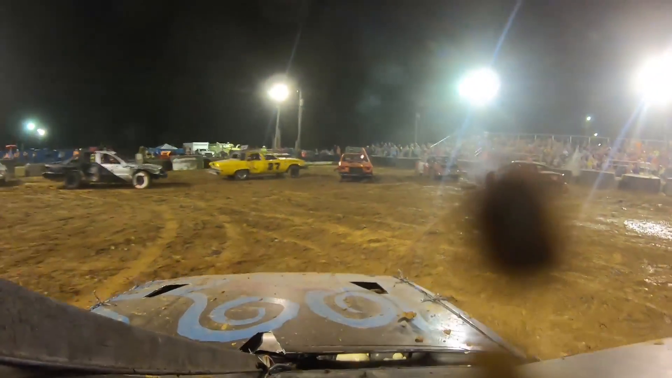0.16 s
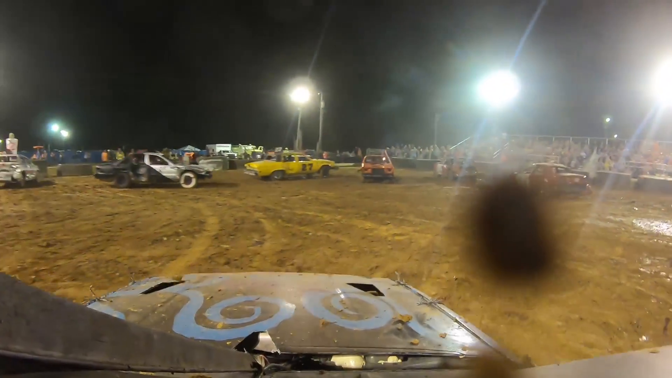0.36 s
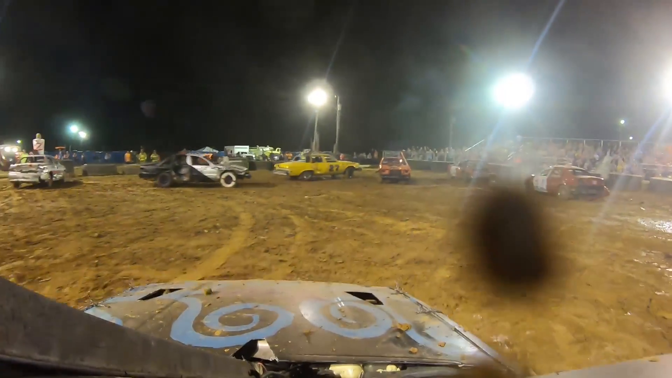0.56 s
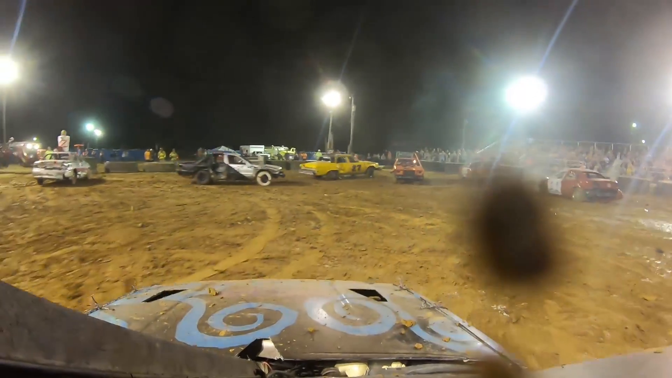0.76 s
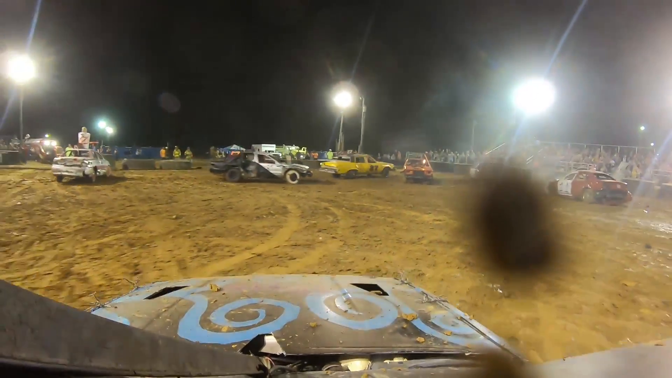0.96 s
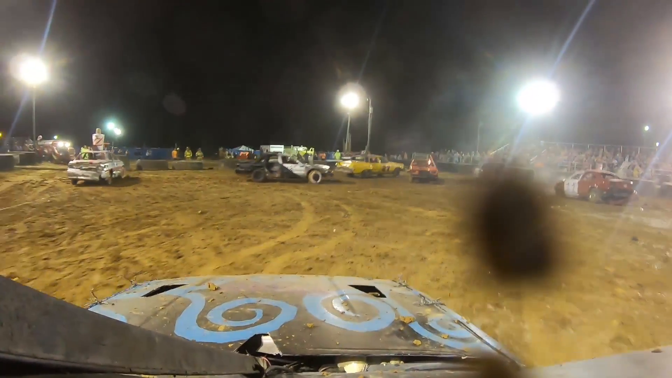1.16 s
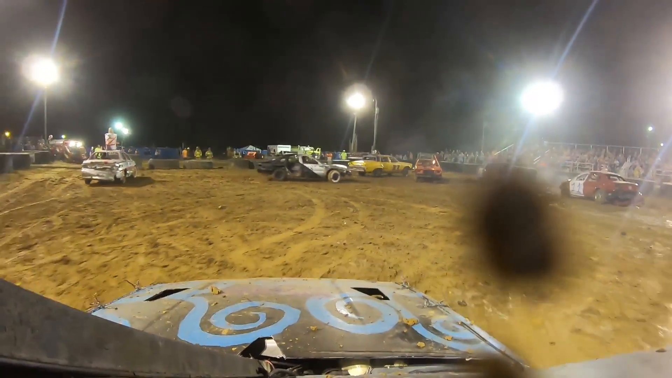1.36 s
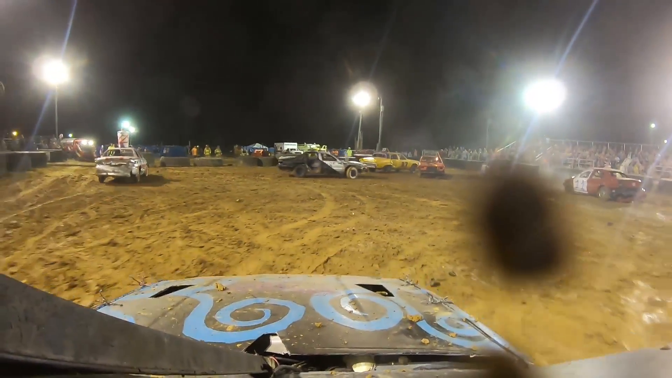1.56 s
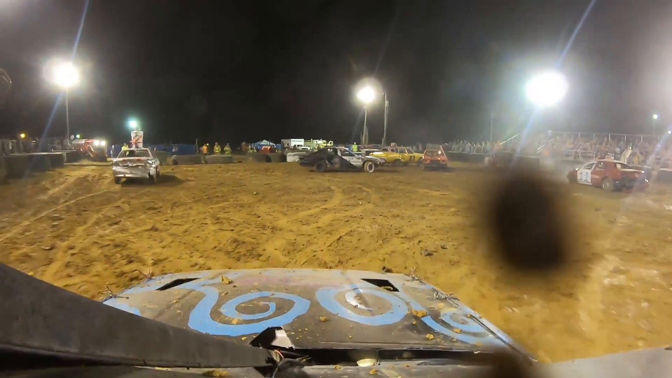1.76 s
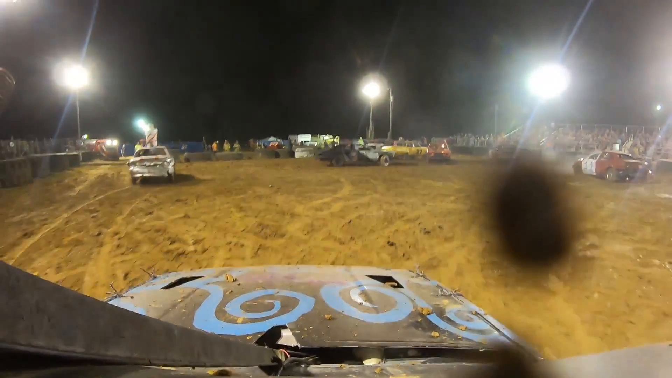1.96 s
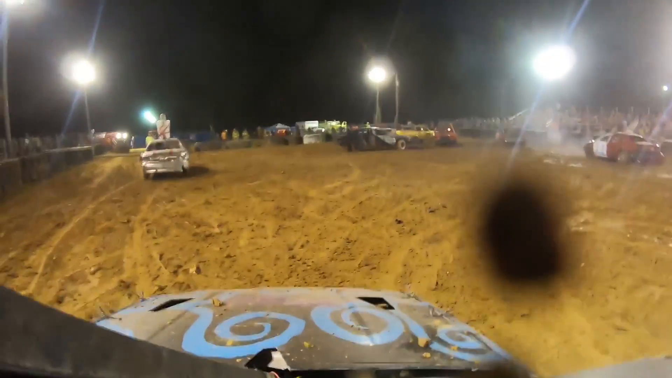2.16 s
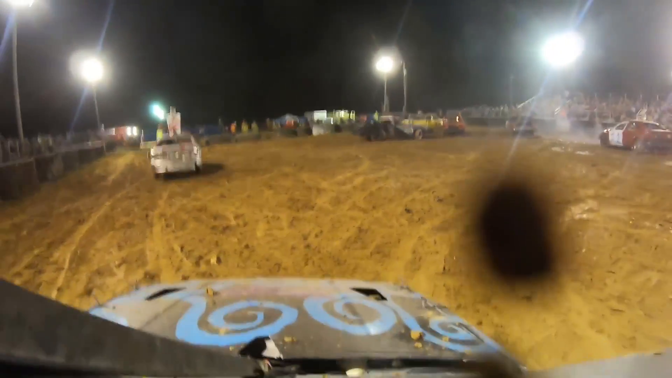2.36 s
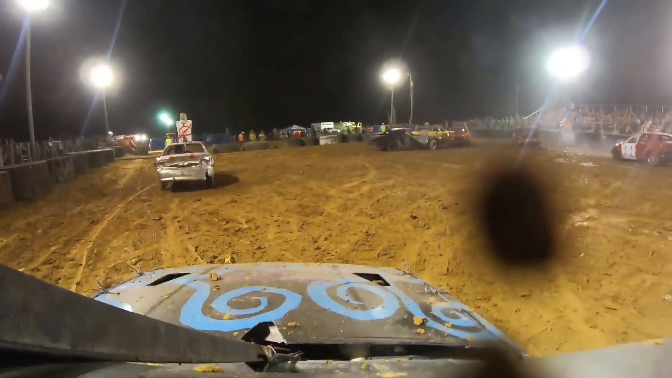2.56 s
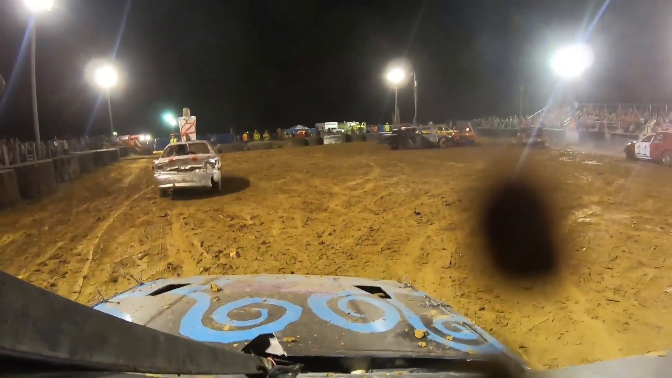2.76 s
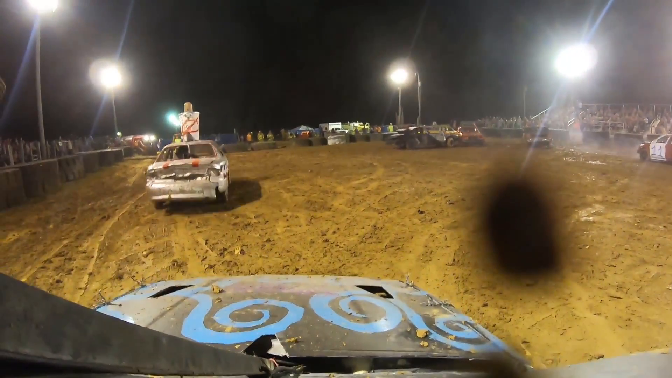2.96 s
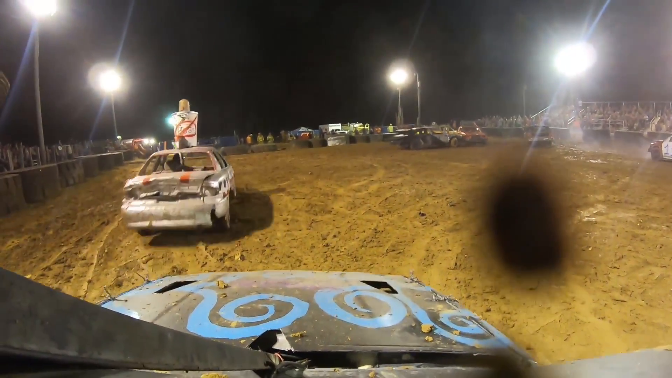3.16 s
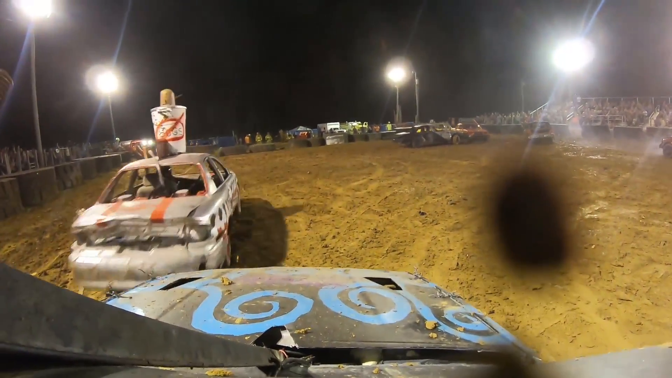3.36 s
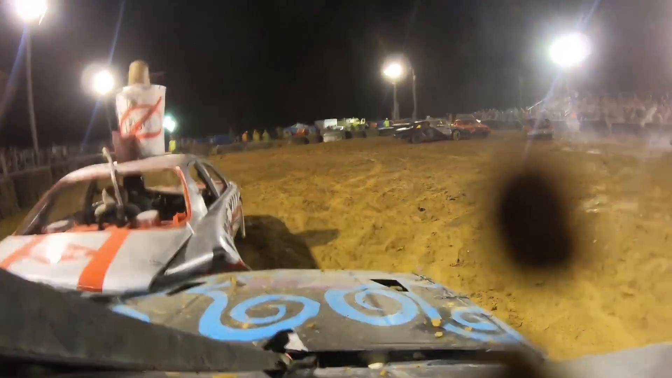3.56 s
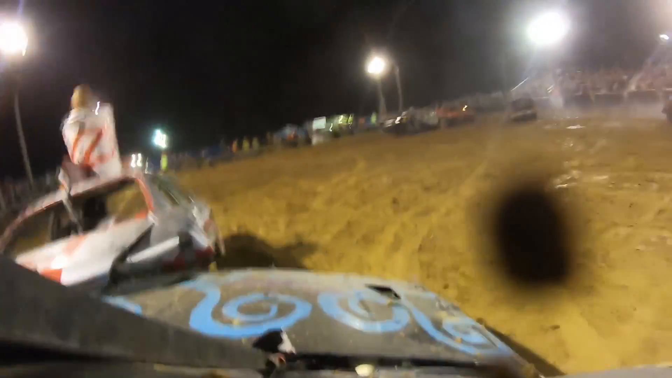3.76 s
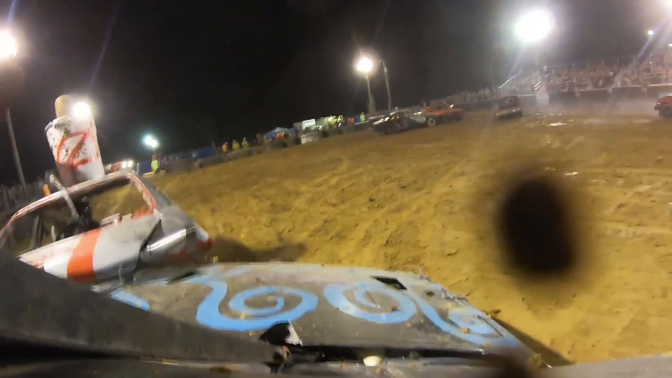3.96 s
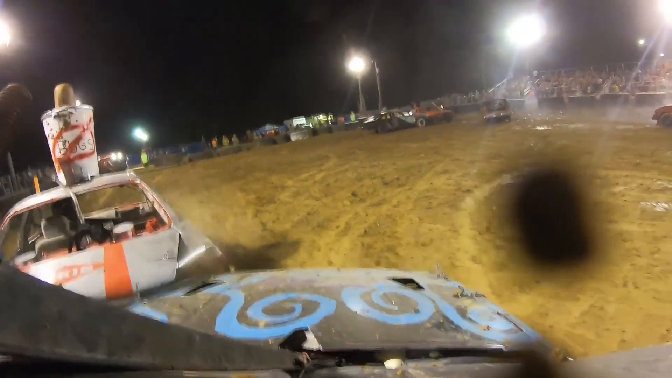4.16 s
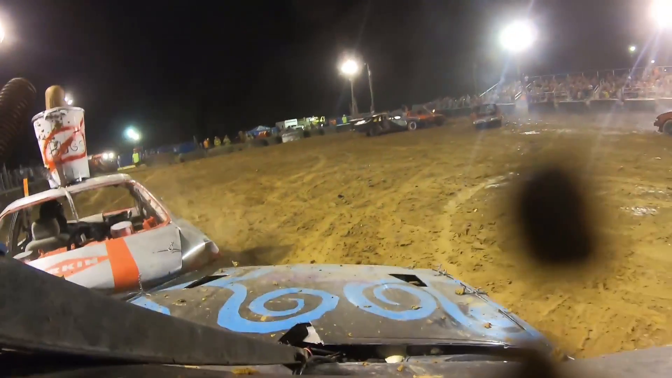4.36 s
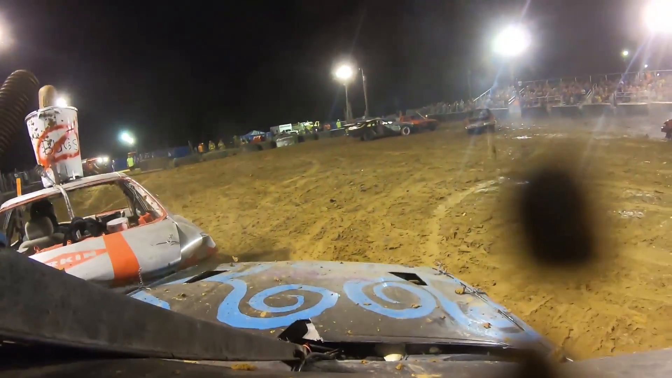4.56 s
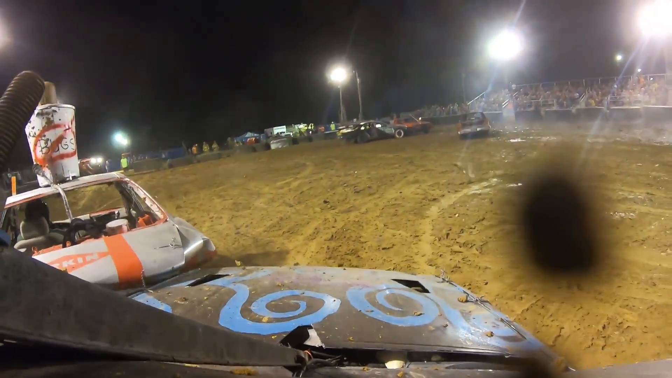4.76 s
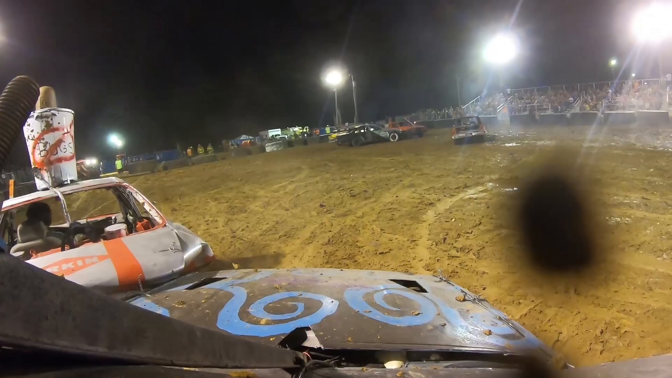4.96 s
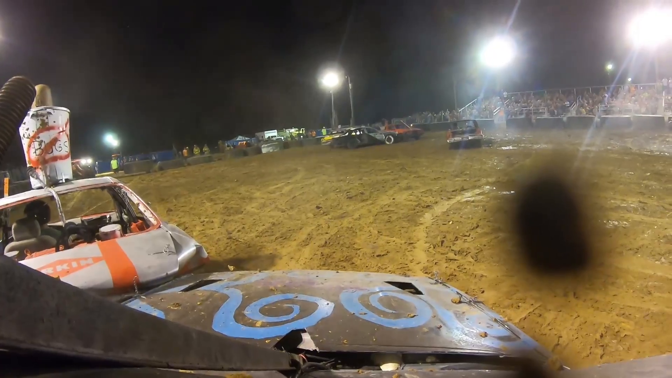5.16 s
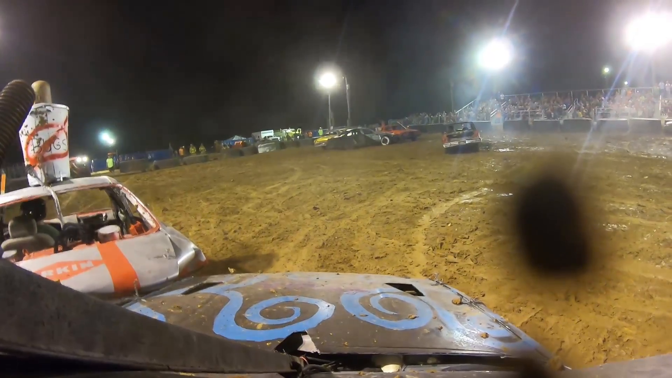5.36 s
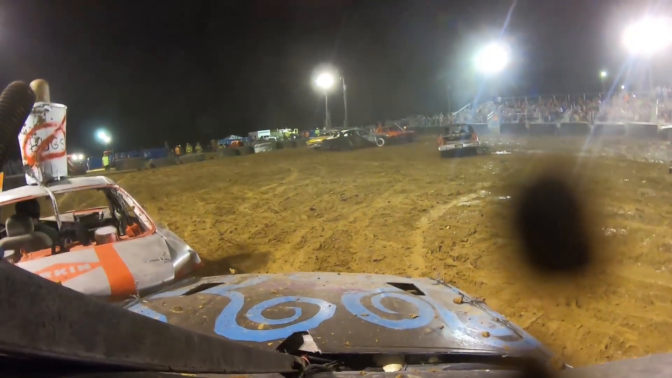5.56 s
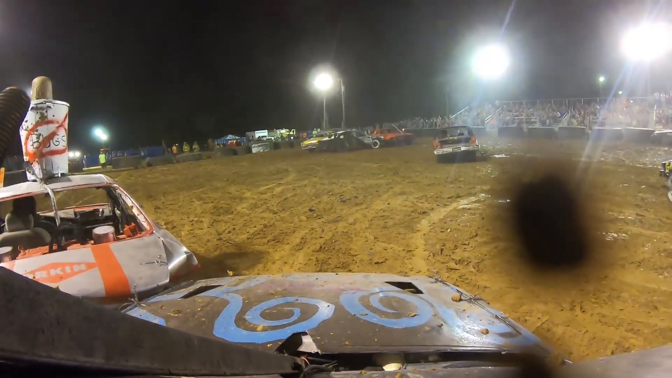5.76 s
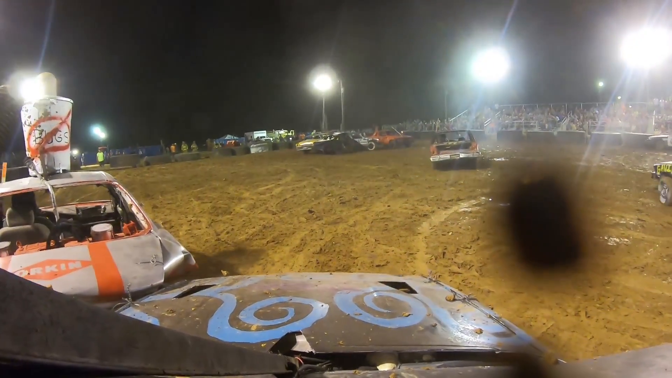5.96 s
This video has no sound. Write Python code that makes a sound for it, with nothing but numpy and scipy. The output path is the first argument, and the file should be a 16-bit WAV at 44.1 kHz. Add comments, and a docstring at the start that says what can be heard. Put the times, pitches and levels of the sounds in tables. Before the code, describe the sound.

A loud V8 heard inside a stripped car idles unevenly, revs twice with volleys of backfire, and metal crunches in a collision.

```python
"""An open-piped V8 lopes, is revved twice and spits volleys of pops, heard inside a stripped stock car.
Its uneven firings boom through the bare cabin and puff out a roar of gas; unburnt fuel bangs in the pipe.
Around it runs a demolition derby: engines drone across the arena, loose panels clank, and a rival car
crumples against the front corner. A limiter ducks the whole mix on the loudest peaks."""
import sys
import numpy as np
from scipy import signal
from scipy.fft import rfft, irfft
from scipy.io import wavfile
from scipy.ndimage import uniform_filter1d, minimum_filter1d

SR = 44100
rng = np.random.default_rng(int(sys.argv[2]) if len(sys.argv) > 2 else 0)


def store_pcm(level_fs):
    """Save levels as 16-bit WAV."""
    pcm = np.round(np.clip(level_fs, -1, 1) * 32767).astype(np.int16)
    wavfile.write(sys.argv[1], SR, np.atleast_2d(pcm).T)


N = 265041
T = np.arange(N) / SR


def amp(db):
    """Decibels to gain."""
    return 10 ** (np.asarray(db) / 20)


def unit(x):
    """Scales to rms 1."""
    return x / np.sqrt(np.mean(x ** 2) + 1e-20)


def curves(rows):
    """Automation lanes: each column of a timed table, at every sample."""
    times, *columns = np.transpose(rows)
    return [np.interp(T, times, column) for column in columns]


def gate(start_s, end_s, fade_s=0.081):
    """1 from start to end, with a fade outside each edge."""
    return np.clip(np.minimum(T - start_s, end_s - T) / fade_s + 1, 0, 1)


def add(mix, start_s, sound):
    """Drops a sound into the mix."""
    part = mix[max(round(start_s * SR), 0):][:len(sound)]
    part += sound[:len(part)]


def colour(x, points):
    """EQ curve that dies away within an octave past its ends; rms 1."""
    hz, db = np.transpose(points)
    hz = np.r_[hz[0] / 2, hz, hz[-1] * 2]
    db = np.pad(db, 1, constant_values=-100)
    bins_hz = np.fft.rfftfreq(len(x), 1 / SR)
    gain = amp(np.interp(np.log(bins_hz + 1), np.log(hz), db))
    return unit(irfft(rfft(x) * gain, len(x)))


def wander(rate_hz, hop=16):
    """Random motion up to about rate_hz; rms 1."""
    count = N // hop + 2
    bins_hz = np.fft.rfftfreq(count, hop / SR)
    slow = irfft(rfft(rng.standard_normal(count)) / (1 + (bins_hz / rate_hz) ** 4))
    return unit(np.interp(np.arange(N) / hop, np.arange(len(slow)), slow))


def ring(x, modes):
    """Passes x through a bank of resonances with steep skirts."""
    out = np.zeros(len(x))
    for hz, width, db in modes:
        band = signal.butter(2, [hz - width / 2, hz + width / 2], "band", fs=SR, output="sos")
        out += amp(db) * signal.sosfilt(band, x)
    return out


def steady(x, window_s):
    """Holds the short-term level at 1."""
    power = abs(uniform_filter1d(x ** 2, int(window_s * SR) + 1))
    return x / np.sqrt(power + 1e-12)


# Engines across the arena, one table each: time_s, firing_hz, level_db
FAR_ENGINES = [
    [(0, 87.2, -25.5), (.2, 92, -19), (.8, 110, -28), (1.05, 137.7, -23)],
    [(1.35, 185.9, -38), (1.55, 195.1, -24.5), (1.7, 210.9, -25), (2.9, 233.1, -27)],
    [(3.2, 94, -24.5), (3.4, 98.2, -17), (3.6, 113.3, -20)],
    [(4.9, 96.76, -21), (5.2, 108.4, -16), (5.33, 110.5, -21)],
]
def far_engines(waver=0.0079, fading_db=2.5, octave_db=-15, trim_db=-1, harmonics=5):
    """Distant drones: dull stacks of firing harmonics that glide and fade in and out."""
    out = np.zeros(N)
    for rows in FAR_ENGINES:
        hz, db = curves(rows)
        phase = 2 * np.pi * np.cumsum(hz * (1 + waver * wander(20.5))) / SR
        stack = sum(amp(octave_db * np.log2(k) + fading_db * wander(10)) * np.sin(k * phase)
                    for k in range(1, harmonics + 1))
        out += amp(db + trim_db) * gate(rows[0][0], rows[-1][0]) * unit(stack)
    return out


def arena_buzz(echo_s=0.007, waver=0.01402):
    """Sharp firings of the far engines, smeared by the arena into fine, shifting partials."""
    drift = 1 + waver * wander(14.02)
    pulses, t = np.zeros(N), np.arange(4096) / SR
    for rows in FAR_ENGINES:
        fired = np.floor(np.cumsum(curves(rows)[0] * drift) / SR)
        pulses += gate(rows[0][0], rows[-1][0]) * np.diff(fired, prepend=0)
    echo = rng.standard_normal(len(t)) * np.exp(-t / echo_s)
    return unit(signal.oaconvolve(pulses, echo)[:N])


# Hums, whirrs and hisses that swell and fade: start_s, end_s, pitch_hz, width_hz, level_db
BODY_HUMS = [(0.24, 0.57, 239, 6.6, -24), (0.78, 2.65, 242, 4.5, -27.5), (1.47, 1.74, 91, 7, -16),
             (2.11, 2.535, 229, 10.4, -21.5), (5.1, 5.35, 205, 73, -23.5), (5.66, 6.05, 234, 6.1, -26.5),
             (0.47, 1.42, 2087, 260, -28.5), (0.7, 2.4, 3330, 260, -39.5), (3.27, 3.67, 2780, 340, -42.5),
             (3.595, 3.675, 2800, 1000, -26.5), (2.52, 3.22, 4340, 540, -44.5), (5.6, 7.35, 4790, 380, -42),
             (1.04, 1.33, 7400, 1900, -50)]
def body_hums():
    """Narrow resonances of the body and engine bay, each shaken for a while; the low row near 90 Hz is a far
    engine's drone."""
    out = np.zeros(N)
    for start, end, hz, width, db in BODY_HUMS:
        arch = np.sin(np.pi * np.clip((T - start) / (end - start), 0, 1))
        tone = ring(rng.standard_normal(N), [(hz, width, 0)])
        out += amp(db) * arch * steady(tone, window_s=0.16)
    return out


# Sub-bass shakes of the shell: start_s, end_s, level_db
SHELL_SHUDDERS = [(0.296, 0.584, -18.5), (1.72, 1.92, -17.5), (2.96, 3.305, -18.5), (3.7, 4.378, -20.5)]
def shell_shudders(pitch_hz=39.1, waver=0.03):
    """The body shell shudders at its lowest resonance."""
    level = sum(amp(db) * gate(start, end) for start, end, db in SHELL_SHUDDERS)
    phase = 2 * np.pi * np.cumsum(pitch_hz * (1 + waver * wander(6.6))) / SR
    return level * np.sqrt(2) * np.sin(phase)


# Ring of the sheet metal: pitch_hz, width_hz, level_db
PANEL_MODES = [(1062, 110, 0.5), (1340, 520, -1.5), (1713, 140, 4.5), (1863, 77, 6)]
# Hits on loose panels: start_s, level_db, length_s, pitch_hz
PANEL_CLANKS = [(1.288, -24, 0.06, 1300), (1.62, -23, 0.068, 1150), (1.732, -24, 0.15, 1170),
                (2.784, -20, 0.029, 1600), (3.575, -18, .018, 1630), (4.283, -31.5, 0.037, 1498),
                (4.412, -32, 0.027, 1800), (4.503, -29.5, 0.014, 1590), (4.653, -30.5, 0.0091, 1800),
                (5.169, -24.5, .012, 2000), (5.203, -24, 0.03, 1700), (5.449, -20, .018, 2300),
                (5.514, -24, 0.022, 1650)]
def panel_clanks(attack_s=0.0022, tail_s=0.015, ping_db=-4, ping_damping=0.31, focus_db=16):
    """A loose panel is tapped, pings and chatters; each hit favours the modes near its own pitch."""
    out, t = np.zeros(N), np.arange(8192) / SR
    hz, width, mode_db = np.transpose(PANEL_MODES)[:, :, None]
    onset = 1 - np.exp(-(t / attack_s) ** 2)
    ping_decay = np.exp(-np.pi * width * ping_damping * t)
    for start, db, length, pitch_hz in PANEL_CLANKS:
        struck_db = mode_db - focus_db * np.log2(hz / pitch_hz) ** 2
        rattle = ring(rng.standard_normal(len(t)), np.hstack([hz, width, struck_db]))
        chatter = steady(rattle, window_s=0.0059) * np.exp(-np.maximum(t - length / 2, 0) / tail_s)
        phase = 2 * np.pi * (hz * t + rng.random(hz.shape))
        pings = amp(struck_db + ping_db) * ping_decay * np.sin(phase)
        add(out, start, amp(db) * onset * (chatter + pings.sum(0)))
    return out


def metal_snaps(per_s=3300, spread_db=3.5):
    """Random tiny snaps of uneven size."""
    size = amp(spread_db * np.minimum(rng.exponential(1, N), 3))
    polarity = rng.choice([-1, 1], N)
    return unit(size * polarity * (rng.random(N) < per_s / SR))


# Tone of the crunch: frequency_hz, level_db
CRUNCH_EQ = [(330, 9.5), (490, 20.5), (640, 6.5), (950, 12.5), (1900, 5), (2500, -5.5), (4700, -17),
             (5800, -30), (14000, -63)]
# Folds of the bodywork: start_s, give_way_s, peak_db, build_up_db, release_s
BODY_FOLDS = [(3.61, 3.654, -19, 6, 0.0047), (3.724, 3.771, -26, 5, 0.024),
              (3.841, 3.904, -13.5, 17, 0.036), (3.988, 4.011, -18, 9, 0.066)]
def collision(ring_db=-7, attack_s=0.0088):
    """Folding sheet metal: dense snaps, partly ringing the panels; each fold builds until it gives way."""
    snaps = metal_snaps()
    metal = colour(snaps, CRUNCH_EQ) + amp(ring_db) * unit(ring(snaps, PANEL_MODES))
    strain = np.zeros(N)
    for start, gives, peak_db, build_db, release in BODY_FOLDS:
        onset = np.clip((T - start) / attack_s, 0, 1)
        build = amp(peak_db - build_db * np.clip((gives - T) / (gives - start), 0, 1))
        strain += onset * build * np.exp(-np.maximum(T - gives, 0) / release)
    return strain * unit(metal)


# Barks as the throttle shuts or the engine stumbles: start_s, level_db
EXHAUST_BARKS = [(2.105, -26), (2.243, -27), (2.517, -28.5), (4.158, -26)]
def exhaust_barks(start_hz=1500, end_hz=480, fall_s=0.034, spread_hz=620, rise_s=0.015):
    """A short, broad rush of gas that darkens as the pipe empties."""
    out = np.zeros(N)
    for start, db in EXHAUST_BARKS:
        t = np.maximum(T - start, 0)
        hz = end_hz + (start_hz - end_hz) * np.exp(-t / fall_s)
        swell = np.sqrt(t / rise_s * np.exp(1 - t / rise_s))
        gas = wander(spread_hz) * np.sqrt(2) * np.sin(2 * np.pi * np.cumsum(hz) / SR)
        out += amp(db) * swell * gas
    return out


# Ring of each pop, low thump modes and a bright ring near 2 kHz: pitch_hz, level_db, t60_s
POP_MODES = [(93.8, 14, 0.028), (359, 6, 0.018), (458, -8, 0.026), (1800, -9.5, 0.021), (2138, -15, 0.02),
             (2940, -10, 0.0056)]
# Tone of a pop's spit of noise: frequency_hz, level_db
SPIT_EQ = [(800, 21.5), (2100, 36.5), (2600, 15), (3300, 21), (5000, 11), (6000, -6), (9000, -11),
           (15000, -33.5)]
# Volleys of backfire: start_s, thump_db, crack_db
EXHAUST_POPS = [(2.059, -7, -28), (2.1544, -7.5, -20), (2.178, -7, -16.5), (2.208, -7, -16),
                (2.2311, -10, -17), (2.2591, -4.5, -16), (2.3086, -12, -20.5), (2.354, -9.5, -21.5),
                (2.375, -7.5, -16), (2.403, -10, -19), (2.427, -11, -20), (2.4551, -9, -14.5),
                (2.481, -10.5, -15.5), (2.506, -9, -17.5), (2.540, -15, -22), (2.560, -15, -22),
                (2.591, -9, -18), (2.639, -9, -22), (2.668, -13, -23.5), (2.688, -11.5, -28.5),
                (3.026, -16.5, -32), (3.055, -15, -31), (3.662, -7.5, -14), (3.745, -6, -14.5),
                (3.773, -5, -12), (3.803, -16, -13.5), (3.828, -12, -19), (3.8549, -7.5, -15.5),
                (3.882, -14, -16), (3.9347, -20, -20.5), (4.057, -8, -19.5), (4.085, -21, -27),
                (4.142, -13, -25.5)]
def exhaust_pops(burn_s=0.0017, low_db=5.0, ring_db=14.0, swell=1.28, detune=0.035, plain_crack_db=-17):
    """Unburnt fuel explodes in the pipe: a thump, a short ring and a spit, brighter for hard cracks."""
    out, t = np.zeros(N), np.arange(4096) / SR
    hz, mode_db, t60 = np.transpose(POP_MODES)[:, :, None]
    burst = t / burn_s * np.exp(1 - t / burn_s)
    onset = 1 - np.exp(-(t * hz * swell) ** 2)  # low modes open later: the thump follows the crack
    for start, thump_db, crack_db in EXHAUST_POPS:
        tuning = 1 + detune * rng.standard_normal(hz.shape)
        drive_db = np.where(hz > 1000, crack_db + ring_db, thump_db + low_db)
        modes = amp(mode_db + drive_db - 60 * t / t60) * np.sin(2 * np.pi * hz * tuning * t)
        shelf_db = crack_db - plain_crack_db
        eq = [(f, db + shelf_db * (f > 5500)) for f, db in SPIT_EQ]
        noise = colour(rng.standard_normal(len(t)), eq)
        spit = amp(crack_db) * burst * steady(noise, window_s=0.005)
        add(out, start, spit - (onset * modes).sum(0))
    return out


def dip_after_pops(depth_db=11, hold_s=0.087, per_crack=0.83):
    """A brief level dip after each pop, in dB, deeper after a hard crack."""
    hardest_db = max(crack_db for _, _, crack_db in EXHAUST_POPS)
    dip_db = np.zeros(N)
    for start, _, crack_db in EXHAUST_POPS:
        window = (T > start) * np.exp(-((T - start) / hold_s) ** 4)
        dip_db = np.maximum(dip_db, window * (depth_db + per_crack * (crack_db - hardest_db)))
    return -dip_db


# Engine speed off the throttle, sagging after the crash: time_s, firing_hz
IDLE_SPEED = [(0, 62), (.58, 61), (1.08, 65.4), (1.33, 56), (1.48, 69), (1.8, 52), (2.0, 57), (2.9, 59.7),
              (3.55, 60.3), (4.35, 46), (4.48, 58), (4.95, 69), (5.25, 59.7), (5.39, 77), (5.56, 56),
              (6.01, 66.4)]
# Stabs of the throttle: start_s, end_s, rise_s, spin_down_s, top_firing_hz, growl_db
THROTTLE_STABS = [(2.0, 2.64, .43, .06, 228, -17.5), (3.569, 3.78, .07, .15, 238, -15.5)]
def firing_rate():
    """Firings a second: each rev climbs from idle, holds and spins down."""
    hz = idle_hz = curves(IDLE_SPEED)[0]
    for start, end, rise, spin_down, top_hz, _ in THROTTLE_STABS:
        throttle = np.clip((T - start) / rise, 0, 1) * np.exp(-np.maximum(T - end, 0) / spin_down)
        hz = hz + throttle * (top_hz - idle_hz)
    return hz


# Punch of the eight cylinders in firing order: level_db
CYLINDER_ACCENTS = [8.5, -7.5, -3.5, -11, -5.5, 6, -3, -7]
def v8_firings(lope=0.024, uneven_db=2.5):
    """The crank turns unevenly: its phase, counted in firings, and one impulse for each firing."""
    cycles = np.cumsum(firing_rate() * (1 + lope * wander(12.7))) / SR
    fired_at = np.flatnonzero(np.diff(np.floor(cycles))) + 1
    scatter_db = uneven_db * rng.standard_normal(N)[:len(fired_at)]
    pulses = np.zeros(N)
    pulses[fired_at] = amp(np.resize(CYLINDER_ACCENTS, len(fired_at)) + scatter_db)
    return cycles, pulses


# Fader for the growl between revs: time_s, level_db
GROWL_FADER = [(0, -27), (.8, -28.5), (1.6, -19.5), (2.05, -20.5), (2.8, -34), (4.75, -36), (5.25, -27)]
def growl_gain(rise_s=0.072, fall_db_per_s=23):
    """The growl follows the load, leaps with each rev and dies away slowly."""
    power = amp(curves(GROWL_FADER)[0]) ** 2
    for start, end, *_, db in THROTTLE_STABS:
        onset = np.clip((T - start) / rise_s, 0, 1)
        power += (onset * amp(db - fall_db_per_s * np.maximum(T - end, 0))) ** 2
    return np.sqrt(power)


# Tone of the roar's four bands, low to high: frequency_hz, level_db
GROWL_EQ = [(160, -5.5), (235, 1.5), (280, -11.5), (440, -15), (495, -7), (570, -21.5), (780, -33)]
RASP_EQ = [(640, -20), (800, -14), (1060, -2.5), (1170, -8), (1340, 2), (1800, 0.5), (2020, -8), (2250, -2),
           (2480, -25.5)]
HISS_EQ = [(1700, -16), (2500, 4.5), (2950, 1), (3320, 4), (3650, -4), (4600, -4.5), (5600, -18.5)]
FIZZ_EQ = [(4000, -11), (5600, -0.5), (8020, 0), (9600, -5), (10400, -16.5), (11600, -14), (15000, -32)]
# Group fader for rasp, hiss and fizz: time_s, level_db
RUSH_FADER = [(0, -24.5), (.7, -26), (1.3, -22), (1.9, -20.5), (2.15, -25.5), (2.95, -27.5), (3.22, -32),
              (3.65, -24.5), (3.9, -15.5), (3.97, -35.5), (4.3, -37), (5.2, -29), (6.01, -23)]
def v8_roar(pulses, puff_s=0.0068, throb=0.25, flutter_db=0.88, pulse_db=-12, buzz_db=-7.5,
            rasp_db=-2.5, hiss_db=-14.5, fizz_db=-34.5):
    """Each firing lets out a soft puff of turbulent gas, over engine-bay rush and the arena's buzz."""
    rush_db, dip_db = curves(RUSH_FADER)[0], dip_after_pops()
    puffs = np.tanh(unit(signal.oaconvolve(pulses, np.hanning(int(2 * puff_s * SR)), "same")))
    gas = unit((1 + throb * puffs) * amp(flutter_db * wander(20.0)))
    growl, rasp, hiss, fizz = gas * rng.standard_normal((4, N))
    growl = steady(colour(growl + amp(pulse_db) * unit(pulses), GROWL_EQ), window_s=0.069)
    rasp = colour(rasp + amp(buzz_db) * arena_buzz(), RASP_EQ)
    return (growl_gain() * amp(0.33 * dip_db) * growl  # the lows dip least, the fizz most
            + amp(rush_db + dip_db + rasp_db) * rasp
            + amp(rush_db + dip_db + hiss_db) * colour(hiss, HISS_EQ)
            + amp(0.85 * rush_db + 1.45 * dip_db + fizz_db) * colour(fizz, FIZZ_EQ))


# Low resonances of the bare cabin: pitch_hz, width_hz, level_db
CABIN_MODES = [(40.8, 16.4, -1.5), (58.3, 32.3, -2), (97.8, 18.7, -0.5), (126.9, 27, -9)]
# Faders for the cabin boom and the firing note: time_s, level_db
BOOM_FADER = [(0, -19), (2.1, -16.5), (3.3, -23), (3.85, -15.5), (4.7, -22.5), (5.2, -17)]
NOTE_FADER = [(0, -18.5), (.55, -30), (.72, -18), (.97, -25), (1.28, -15.5), (1.5, -24), (2.16, -15),
              (2.26, -29), (2.62, -35.5), (2.88, -15), (3.15, -29), (3.42, -19), (3.6, -27), (4.3, -24),
              (4.48, -17.5), (4.63, -25), (4.79, -13.5), (5.1, -29.5), (5.4, -16), (5.62, -24),
              (6.01, -17.5)]
def v8_boom(cycles, pulses, shake_db=1, octave_db=-17):
    """Firing pulses and the shaking chassis drive the cabin; the clean firing note rides on top."""
    drive = unit(pulses) + amp(shake_db) * rng.standard_normal(N)
    cabin = steady(ring(drive, CABIN_MODES), window_s=0.065)
    note = unit(np.sin(2 * np.pi * cycles) + amp(octave_db) * np.sin(4 * np.pi * cycles))
    return amp(curves(BOOM_FADER)[0]) * cabin + amp(curves(NOTE_FADER)[0]) * note


def scene():
    """The mono mix, as heard from the cabin."""
    cycles, pulses = v8_firings()
    car = v8_boom(cycles, pulses) + shell_shudders() + v8_roar(pulses) + body_hums()
    exhaust = exhaust_pops() + exhaust_barks()
    return (car + exhaust + far_engines() + panel_clanks() + collision())[None]


def record(dry, ceiling=0.94, recovery_db_per_s=120, cutoff_hz=15600):
    """A limiter ducks everything after each loud pop; a low-pass then trims the top."""
    over_db = 20 * np.log10(np.maximum(abs(dry[0]) / ceiling, 1))
    recovery_db = T * recovery_db_per_s
    held_db = np.maximum.accumulate(over_db + recovery_db) - recovery_db
    gain_db = uniform_filter1d(minimum_filter1d(-held_db, size=65), size=65)  # closes ahead of each peak
    lowpass = signal.firwin(511, cutoff_hz, window=("kaiser", 9), fs=SR)
    return signal.oaconvolve(dry * amp(gain_db), lowpass[None], "same")


dry = scene()
out = record(dry)
store_pcm(out)
```